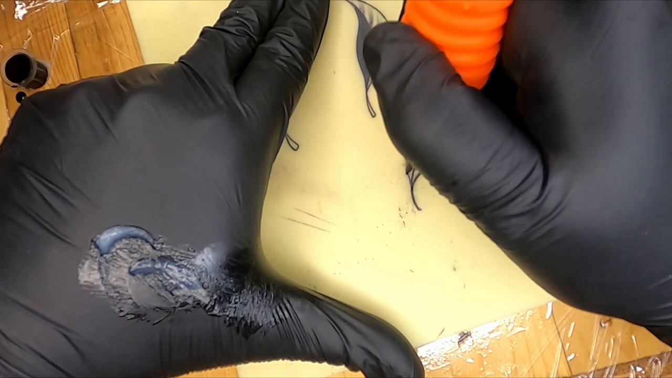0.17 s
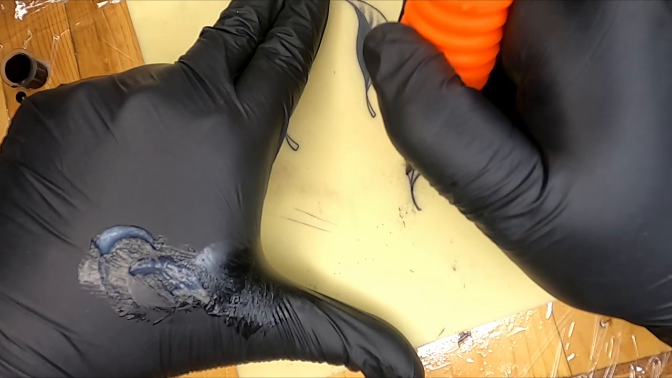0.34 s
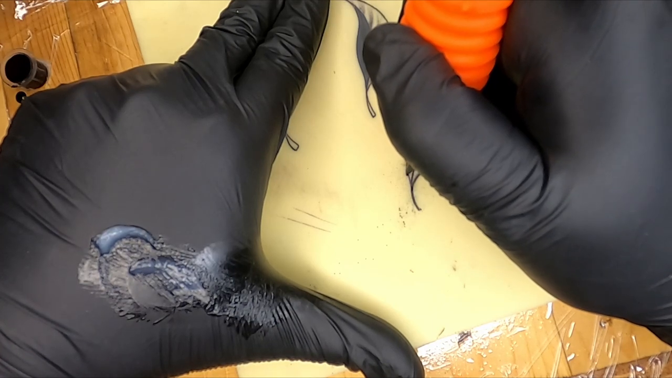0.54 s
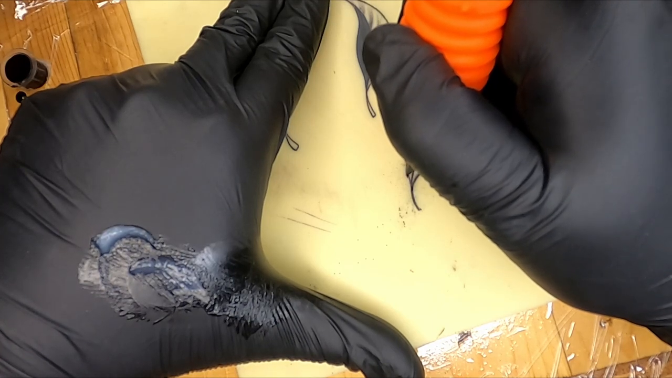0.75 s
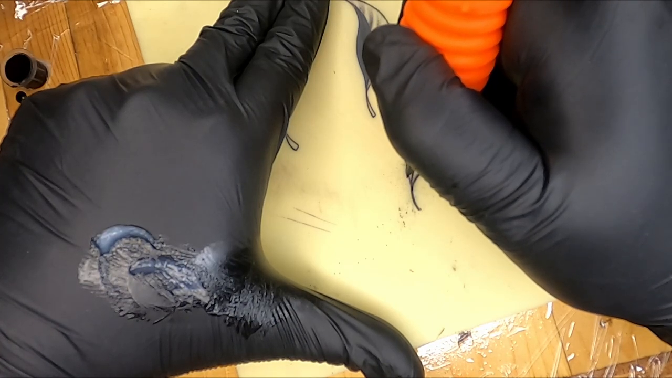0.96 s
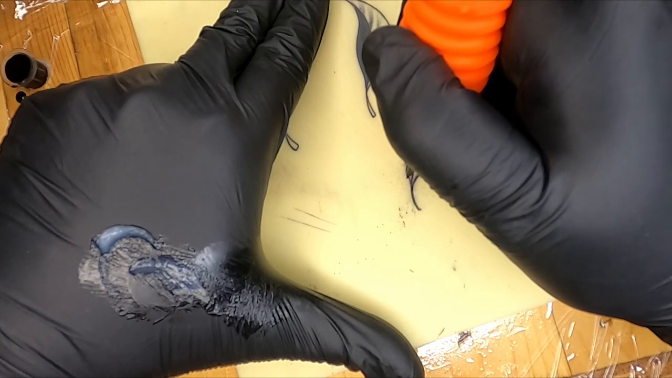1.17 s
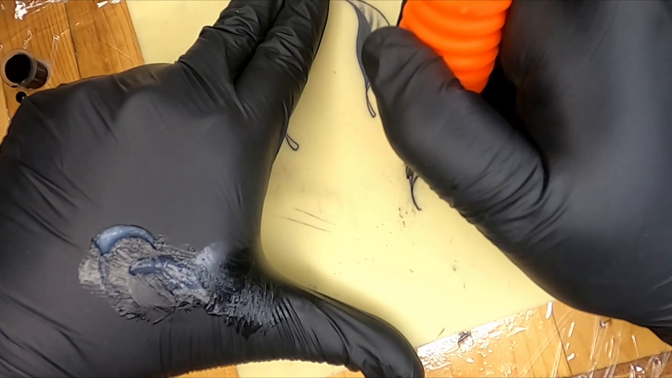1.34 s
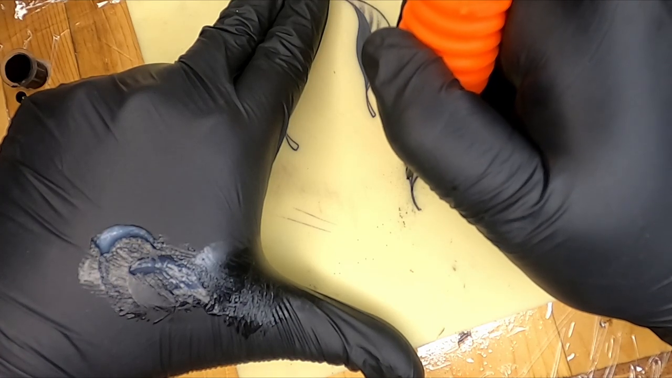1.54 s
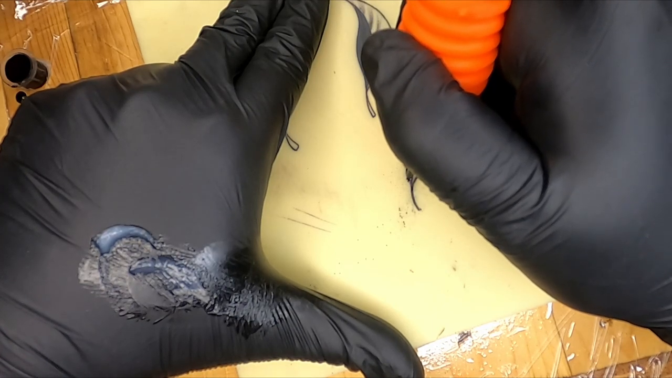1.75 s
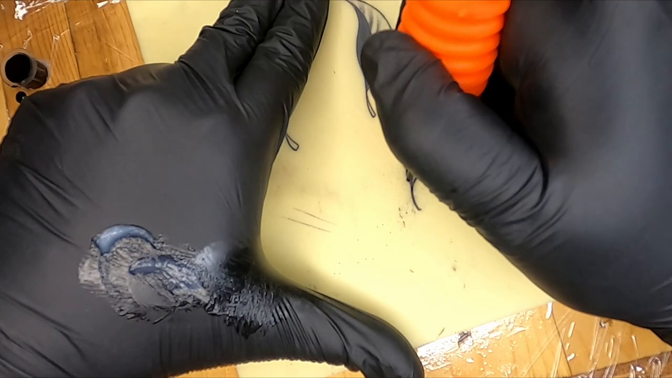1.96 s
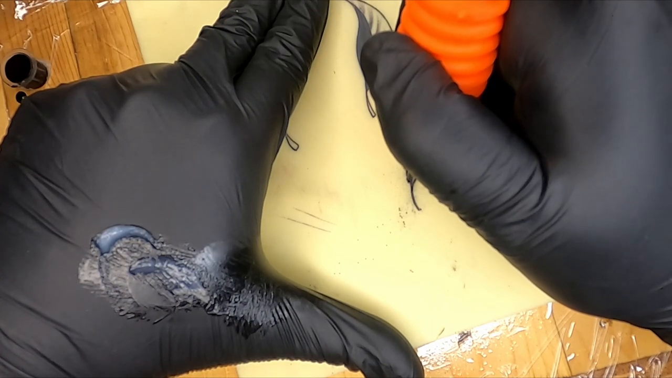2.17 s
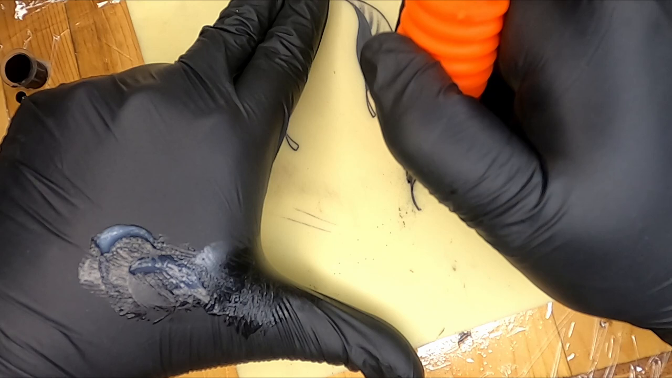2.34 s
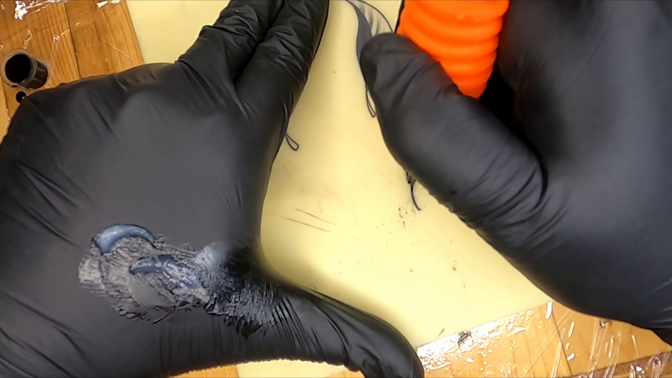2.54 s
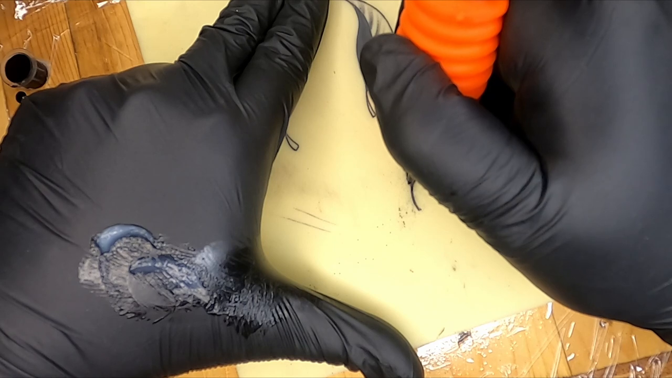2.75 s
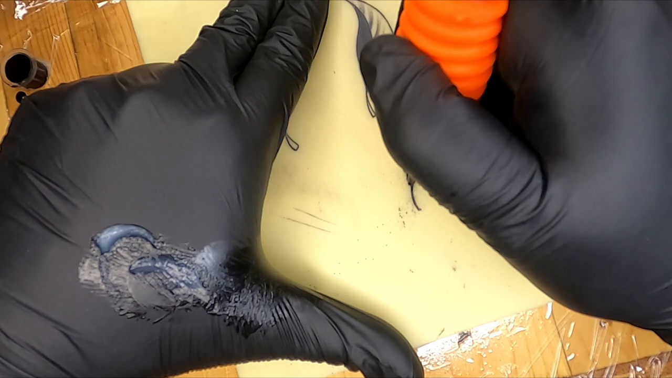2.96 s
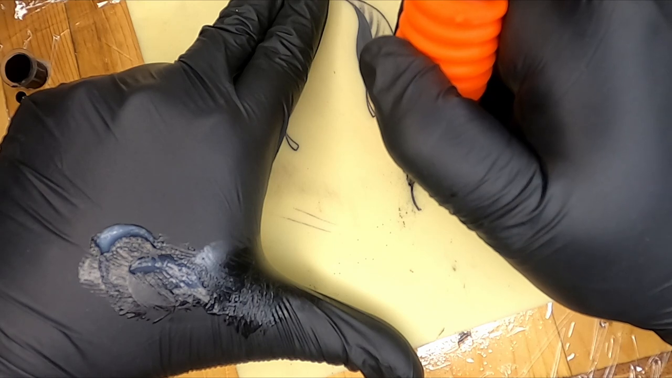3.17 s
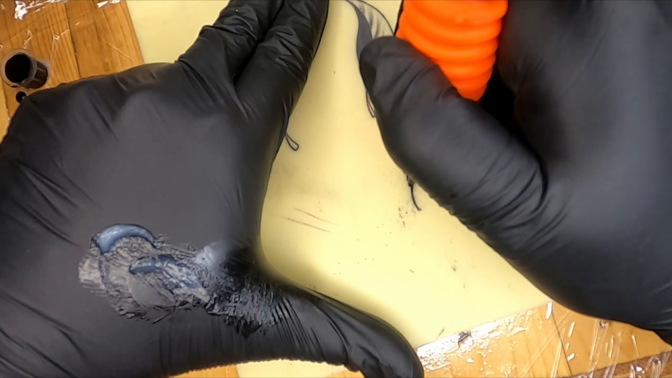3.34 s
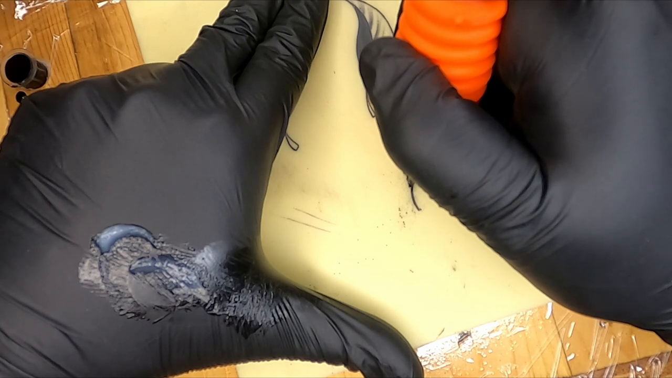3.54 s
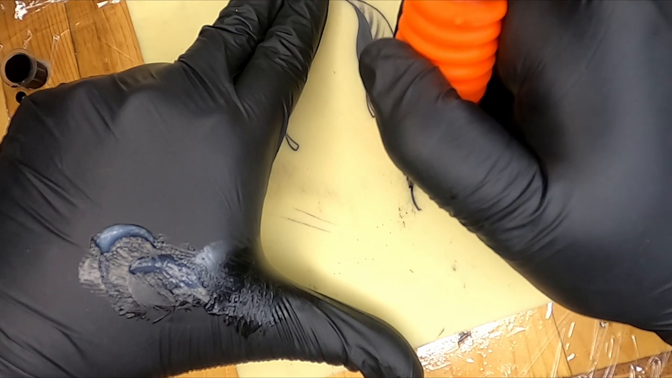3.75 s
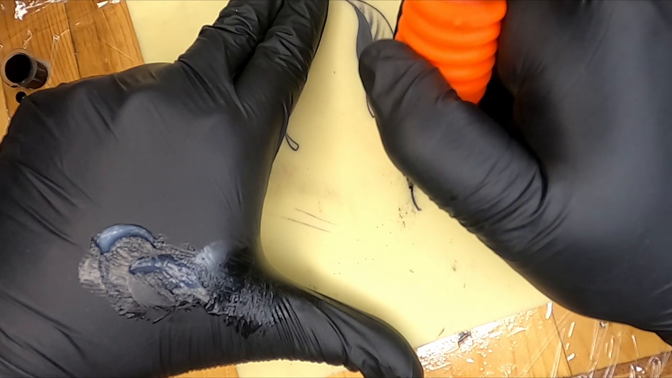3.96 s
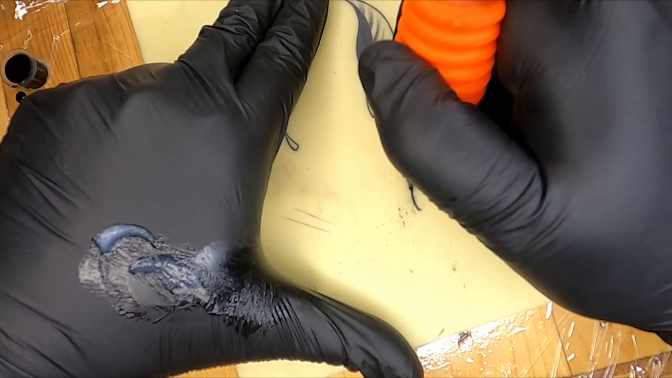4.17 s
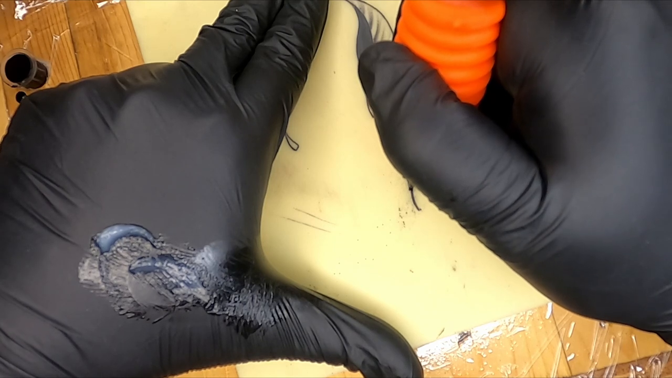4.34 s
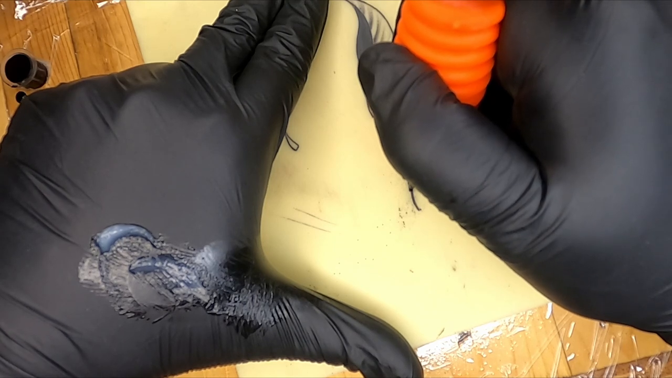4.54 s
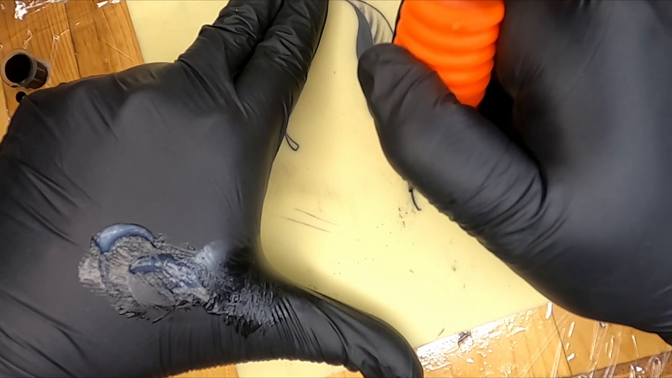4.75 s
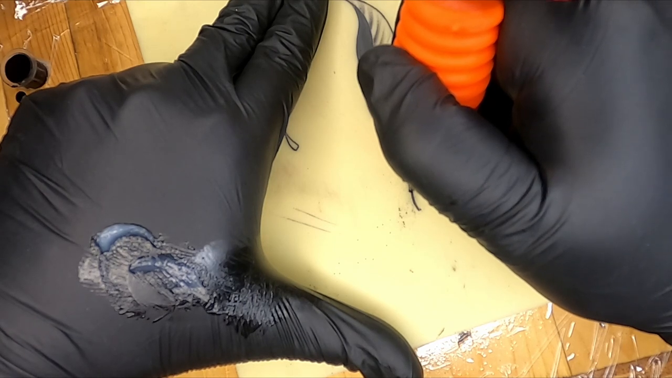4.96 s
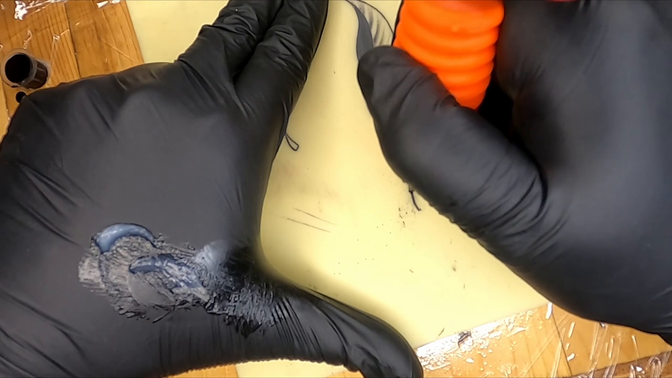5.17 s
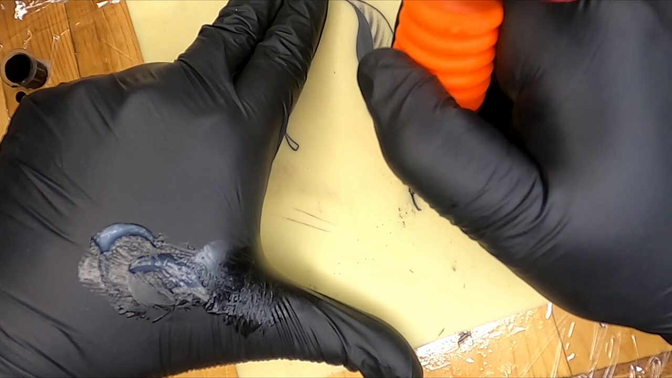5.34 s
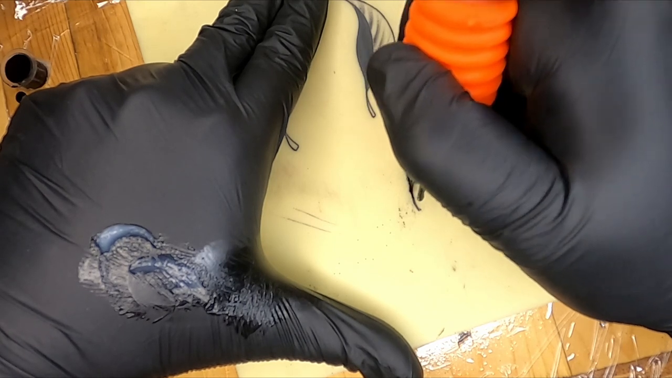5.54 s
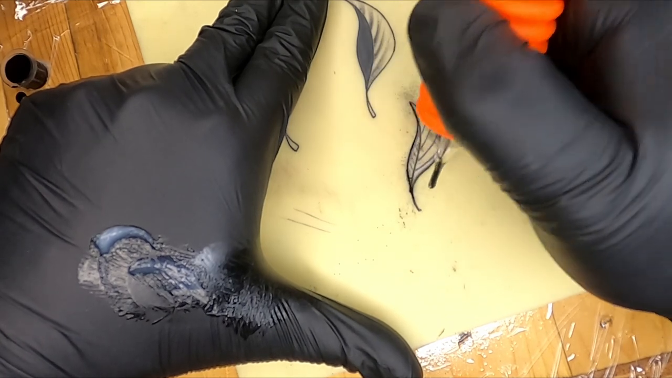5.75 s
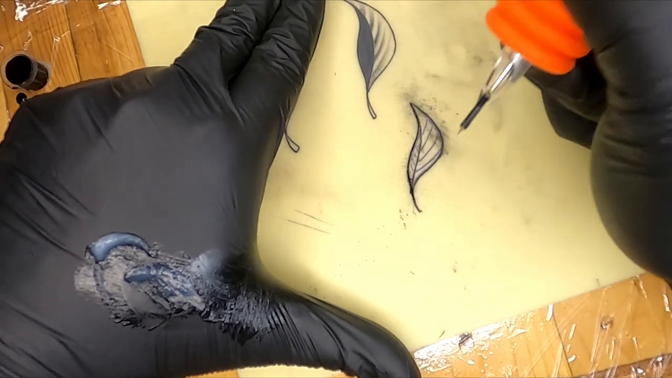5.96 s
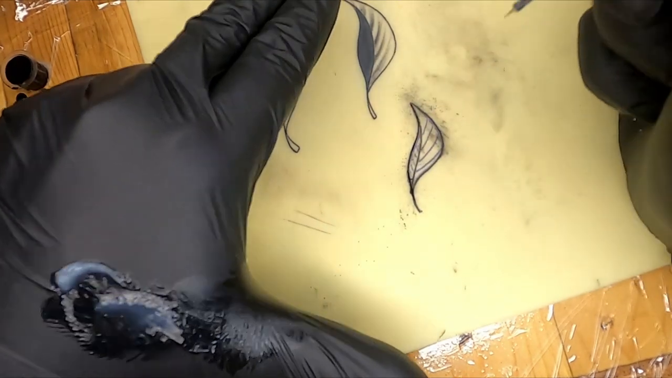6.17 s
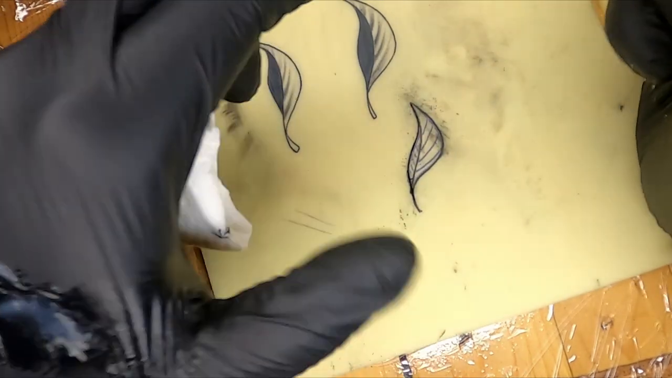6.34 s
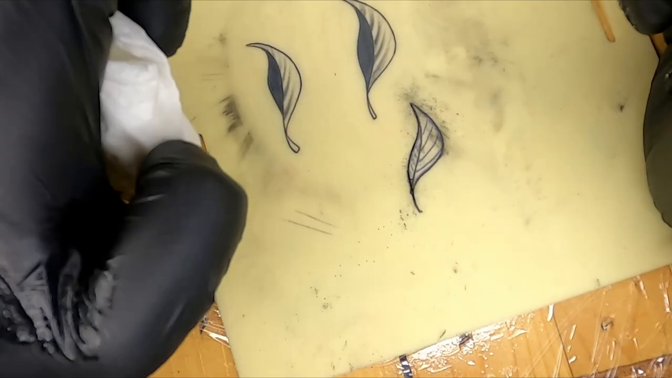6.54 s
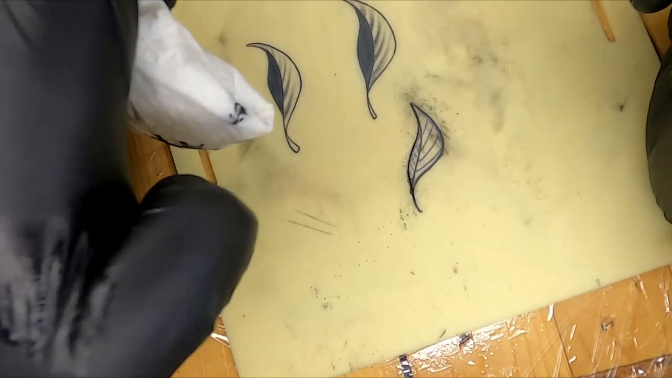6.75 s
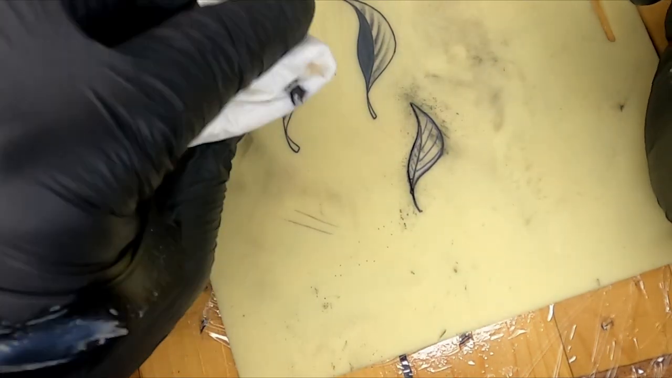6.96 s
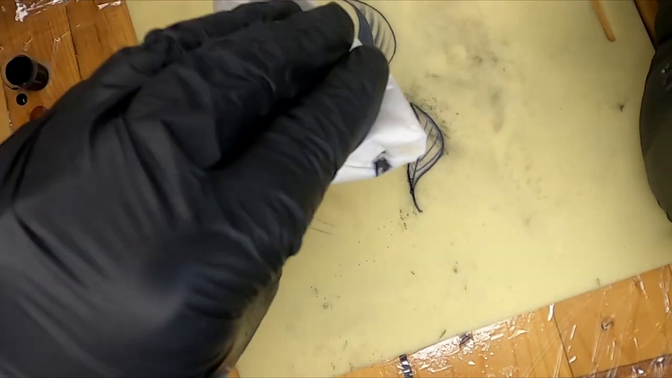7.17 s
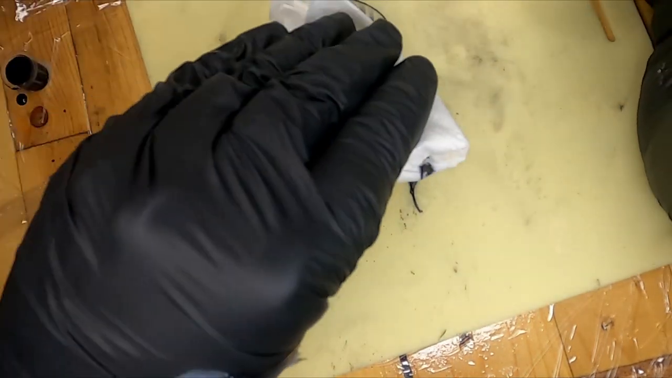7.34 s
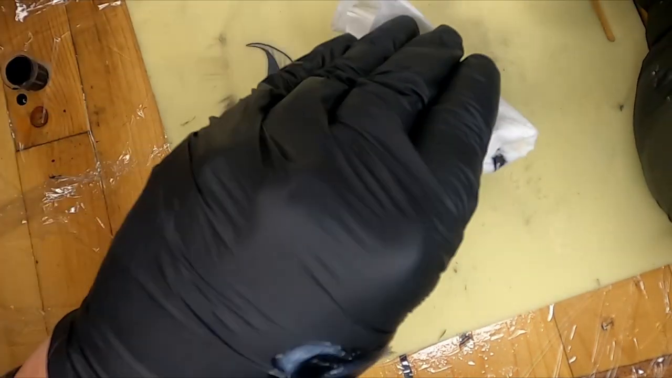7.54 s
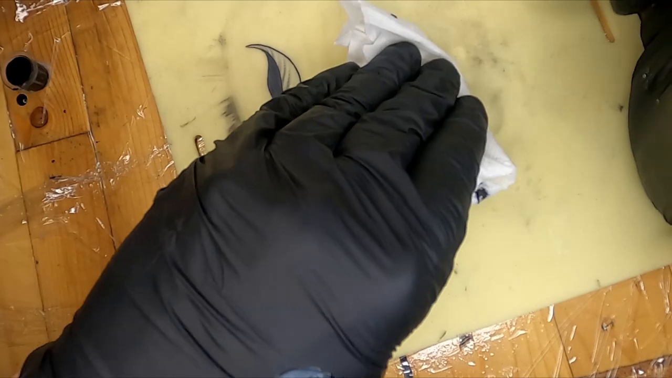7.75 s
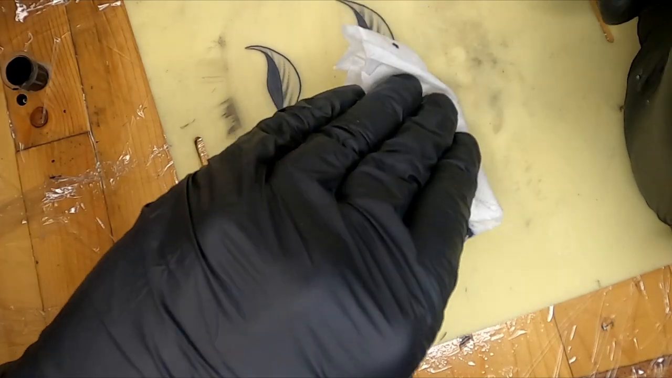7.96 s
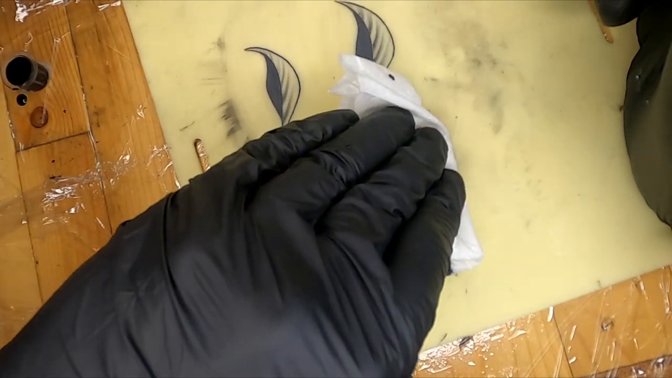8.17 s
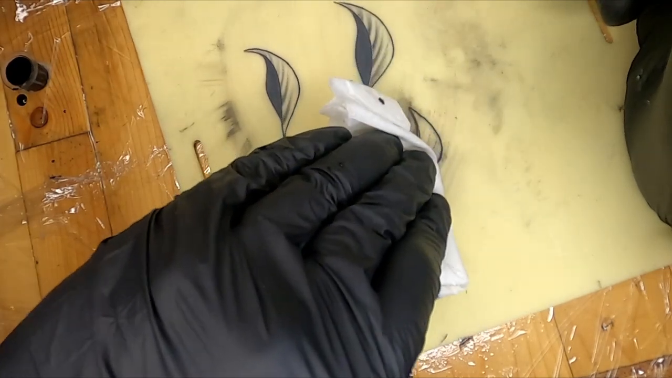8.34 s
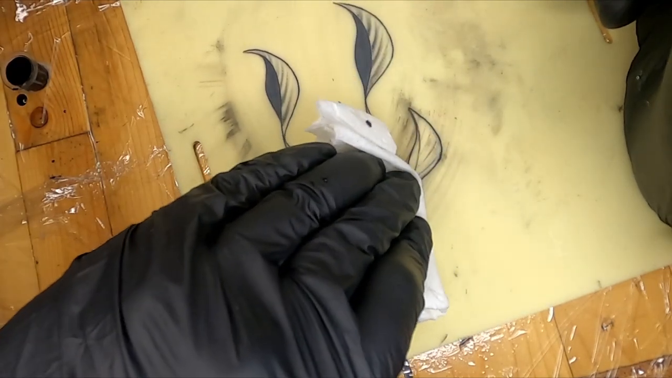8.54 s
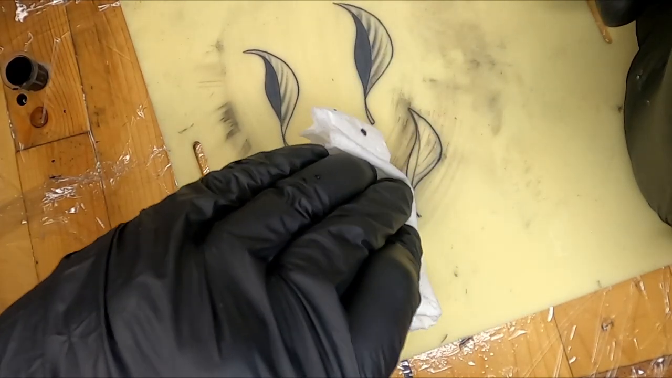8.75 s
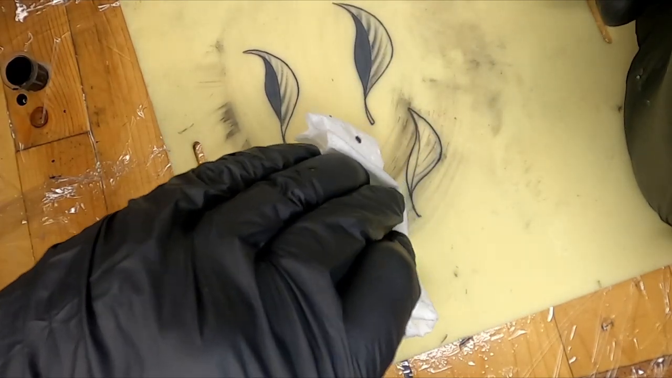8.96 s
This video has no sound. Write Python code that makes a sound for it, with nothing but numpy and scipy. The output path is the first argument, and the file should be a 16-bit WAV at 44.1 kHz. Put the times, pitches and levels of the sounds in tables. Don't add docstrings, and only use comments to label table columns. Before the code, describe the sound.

A rotary tattoo pen buzzes bright and steady up close, then is lifted away and runs on quieter while a towel softly wipes rubber.

```python
import sys
import numpy as np
from scipy import signal
from scipy.fft import rfft, irfft
from scipy.io import wavfile
from scipy.ndimage import uniform_filter1d, map_coordinates

SR = 44100
rng = np.random.default_rng(int(sys.argv[2]) if len(sys.argv) > 2 else 0)


def master(y):
    cut = np.clip(np.atleast_2d(y).T, -1, 1)
    pcm = np.round(cut * 32767)
    wavfile.write(sys.argv[1], SR, pcm.astype(np.int16))


def amplitude_ratio(level_db):
    exponent = np.asarray(level_db, float) / 20
    return 10 ** exponent


N = 396900

SHAFT_HZ = 105.4
NEEDLE_OUT_S = 5.47


def unit(x):
    return x / np.sqrt(np.mean(x ** 2))


def curve(table):
    seconds, values = np.array(table, float).T
    return np.interp(np.arange(N) / SR, seconds, values)


def by_place(place, db):
    return amplitude_ratio(np.interp(place, np.arange(3), db))


def walk(rate, size=N):
    hold = int(SR / rate * size / N)
    steps = np.repeat(rng.standard_normal(size // hold + 1), hold)
    return unit(uniform_filter1d(uniform_filter1d(steps, hold), hold)[:size])


def swells(rows):
    t = np.arange(N) / SR
    return sum(db * np.cos(np.pi * np.clip((t - middle) / length, -.5, .5)) ** 2 for middle, length, db in rows)


def band(x, hz, width_hz):
    g, k = np.tan(np.pi * min(hz, .45 * SR) / SR), width_hz / hz
    return signal.lfilter([k * g, 0, -k * g], [1 + k * g + g * g, 2 * (g * g - 1), 1 - k * g + g * g], x)


def steady(x, span_s=0.26):
    return x / np.sqrt(uniform_filter1d(x ** 2, int(span_s * SR)))


def clicks(at, size):
    out, near = np.zeros(N + 64), np.arange(-8, 9)
    keep = (at > 8) & (at < N - 9)
    whole = np.round(at[keep]).astype(int)[:, None] + near
    off = whole - at[keep][:, None]
    np.add.at(out, whole, size[keep][:, None] * np.sinc(off) * np.cos(np.pi * off / 18) ** 2)
    return out[:N]


def shaft():
    # time in seconds, turns ahead of a steady shaft.
    drift = [(0, -.08), (.43, -.117), (.7, -.092), (1.7, -.155), (1.85, -.18), (2.4, -.148), (2.95, -.085),
             (3.5, .03), (3.79, .13), (4.19, .173), (4.94, .5), (5.5, .66), (6.07, .454), (6.5, .466),
             (6.56, .517), (7.53, .562), (8.39, .45), (9, .43)]
    # start in seconds, length in seconds, turns lost.
    bites = [
        (1.19, .12, .025),
        (1.8, .18, .15),
        (2.32, .16, .08),
        (2.65, .11, .07),
        (3.3, .2, .05),
        (5.08, .11, .09),
    ]
    t = np.arange(N) / SR
    lost = sum(slip * np.clip((t - start) / length, 0, 1) for start, length, slip in bites)
    lost = uniform_filter1d(lost, 3000)
    brake_hz = np.gradient(lost) * SR
    lining = uniform_filter1d(1. * (t < NEEDLE_OUT_S), 4000)
    hunt = .002 * (1 + 2.2 * lining) * walk(12) + .007 * brake_hz * walk(28)
    return SHAFT_HZ * t + uniform_filter1d(curve(drift), 3000) - lost + hunt, brake_hz


def knocks(turns, place, cartridge_db):
    # moment in turns, colour in Hz, width in Hz, level in dB lining, lifted and resting.
    contacts = [
        (-.05, 7000, 30000, 0, 0, 0),
        (-.3, 7800, 1500, -8, -13, -10),
        (-.17, 5000, 8000, -22, -11, -10),
        (-.24, 9500, 5000, -20, -7, -8),
        (-.36, 3800, 3000, -22, -9, -12),
        (.55, 4000, 5000, -20, -12, -12),
    ]
    # resonance in Hz, width in Hz, usual level against the knock in dB lining, lifted, resting.
    cartridge = [(3650, 194, -17.5, -2.5, -36), (4010, 580, -17, -18.5, -14)]
    whole = np.arange(int(turns[-1]) + 2)
    drag = np.clip(SHAFT_HZ - np.gradient(turns) * SR, 0, 1)
    strikes = 0
    for k, (turn, hz, width_hz, *db) in enumerate(contacts):
        jitter_s, scatter_db = (12e-6, 2.5) if k else (3e-6, .5)
        chance = rng.standard_normal((len(whole), 2)).T
        at = np.interp(whole + turn, turns, np.arange(N))
        chance = chance * (1 + 0.63 * np.interp(at, np.arange(N), drag))
        chance = chance * np.interp(np.interp(at, np.arange(N), place), [0, 1], [1, .45])
        blows = clicks(at + chance[0] * jitter_s * SR, amplitude_ratio(scatter_db * chance[1]))
        strikes = strikes + by_place(place, db) * band(blows, hz, width_hz)
    fade = np.exp(-((turns - contacts[0][0]) % 1) / .07)
    rattle = amplitude_ratio(-8 + 4 * drag) * by_place(place, [0, -6, -6]) * fade
    grind = by_place(place, [-18, -19, -20])
    body = ring(unit(strikes) + (rattle + grind) * rng.standard_normal(N), place)
    for (hz, width_hz, *usual_db), db in zip(cartridge, cartridge_db):
        body = body + (amplitude_ratio(db) / by_place(place, usual_db) - 1) * band(body, hz, width_hz)
    return body + (amplitude_ratio(1.28 * drag * (1.5 + .5 * walk(25))) - 1) * band(body, 11900, 4500)


def ring(x, place):
    # resonance in Hz, width in Hz, level in dB lining, lifted and resting.
    shell = [(3610, 520, -4, -2.5, -3), (4325, 365, -2, -10.5, -15.5), (4886, 1100, -1.5, -7, -8.5),
             (5457, 680, -1, -12, -21), (6265, 500, -4, -5.5, -5.5), (6910, 830, 4, -4, -7.5),
             (7800, 950, 4, -1.5, -1.5), (8170, 840, 4, -3, -1.5), (9204, 610, -0.5, -1.5, -5.5),
             (9880, 550, 4, -3.5, 3), (11650, 1000, -14, -34, -12), (12350, 810, -3, -7, -13),
             (14200, 910, -23, -11.5, -13), (14700, 1500, -7, -15, -16)]
    # Hz, width in Hz, change in dB.
    notches = [
        (8606, 143, -13),
        (11360, 190, 3),
        (13340, 840, -1),
    ]
    shell_low_hz = [3850, 2700, 2700]
    f, out = np.fft.rfftfreq(1024, 1 / SR) + 1, 0
    late_s = .00045 * np.minimum(((f - 5800) / np.where(f > 5800, 4200, 2900)) ** 2, 1.1)
    spread = np.exp(-2j * np.pi * np.cumsum(late_s) * SR / 1024)
    for k in range(3):
        power = sum(amplitude_ratio(2 * row[2 + k]) / (1 + (2 * (f - row[0]) / row[1]) ** 2) ** 1.6 for row in shell)
        log_gain = np.log(power / (1 + (shell_low_hz[k] / f) ** 16)) / 2
        for hz, width_hz, db in notches if k == 0 else []:
            log_gain += np.log(amplitude_ratio(db)) * np.exp(-((f - hz) / width_hz) ** 2)
        fold = irfft(log_gain)[:513] * np.r_[1, np.full(511, 2), 1]
        response = irfft(np.exp(rfft(fold, 1024)) * spread)
        out = out + np.clip(1 - abs(place - k), 0, 1) * signal.fftconvolve(x, response)[:N]
    return out


def mirrored(x, place):
    # delay in ms lining, delay in ms away, level in dB lining, lifted, resting.
    mirrors = [(.2, .55, -12, -13, -13), (1.05, .8, -13, -12, -12), (1.75, 2.1, -17, -12, -14),
               (2.9, 2.5, -23, -13, -14)]
    moving = np.clip(uniform_filter1d(np.gradient(place) * SR, 8000), 0, 1)
    passing = amplitude_ratio(3 * moving)
    out = x
    for near_ms, away_ms, *db in mirrors:
        sway_ms = (.004 + .04 * np.minimum(place, 1)) * walk(2)
        lag = (np.interp(place, [0, 1], [near_ms, away_ms]) + sway_ms) * SR / 1000
        out = out + by_place(place, db) * passing * map_coordinates(x, [np.arange(N) - lag], order=3)
    return out


def echoes(x, place, t60_s=.12):
    t = np.arange(int(.15 * SR)) / SR
    tails = rng.standard_normal((3, len(t))) * np.exp(-np.log(1000) * t / t60_s) * (t > .002)
    return sum(np.sqrt(np.clip(1 - abs(place - k), 0, 1)) * signal.fftconvolve(x, tail / np.linalg.norm(tail))[:N]
               for k, tail in enumerate(tails))


def whirr(place):
    return by_place(place, [-22, -24, -24]) * unit(band(rng.standard_normal(N), 11300, 5500))


def hum(turns, place, wander_db=0.63, stray_db=-24):
    # multiple of the shaft rate, level in dB.
    hum_lining = [(1, -14), (2, -13), (3, -8), (4, -14.5), (5, -17), (6, -24.5), (7, -18), (8, -24.5),
                  (9, -4.5), (10, -15.5), (11, -13.5), (12, -5), (13, -2.5), (14, -10), (15, -8.5),
                  (16, -8), (17, -19.5), (18, -26.5), (19, -17.5), (20, -19), (21, -15.5), (22, -11.5),
                  (23, -13.5), (24, -19), (25, -19.5), (26, -17.5), (27, -14), (28, -15.5), (29, -15.5),
                  (30, -14)]
    hum_lifted = [(1, -7), (2, -19), (3, -38), (4, -20), (5, -36), (6, -21), (7, -23.5), (8, -19), (9, -11),
                  (10, -18.5), (11, -9.5), (12, -5), (13, -15), (14, -7), (15, -15), (16, -12.5), (17, -15),
                  (18, -24), (19, -18.5), (20, -9), (21, -15), (22, -13), (23, -13), (24, -7), (25, -14.5),
                  (26, -10.5), (27, -11.5), (28, -11), (29, -9.5), (30, -8)]
    hum_resting = [(1, -4), (2, -15.5), (3, -50), (4, -19), (5, -32), (6, -15), (7, -14.5), (8, -21),
                   (9, -2), (10, -4), (11, 1), (12, 1), (13, -9), (14, -4.5), (15, -14), (16, -6.5),
                   (17, -13), (18, -25), (19, -25), (20, -6), (21, -14), (22, -9), (23, -6), (24, -12),
                   (25, -2.5), (26, -4), (27, -13), (28, -2.5), (29, -7), (30, -45)]
    at = np.arange(0, N, 32)
    out, spot = 0, place[at]
    rough = by_place(spot, [-22, -27, -27])
    turn = np.exp(2j * np.pi * turns)
    spin = turn

    def flutter(rate):
        return walk(rate, size=len(at)) + 1j * walk(rate, size=len(at))

    for lining, lifted, resting in list(zip(hum_lining, hum_lifted, hum_resting))[1:]:
        multiple = round(lining[0])
        root, spin = multiple ** .5, spin * turn
        gain = by_place(spot, [lining[1], lifted[1], resting[1]])
        gain = gain * amplitude_ratio(wander_db * root * walk(2.96, size=len(at)))
        gain = gain * (1 + rough * root * flutter(90)) + amplitude_ratio(stray_db) * np.log10(multiple) * flutter(9)
        phase_turns = .35 * rng.random() - .12 * multiple
        gain = gain * np.exp(2j * np.pi * phase_turns)
        out = out + np.imag(spin * np.interp(np.arange(N), at, gain))
    return out


def chatter(turns, ring_db):
    at = np.interp(np.arange(int(turns[-1])) + .1, turns, np.arange(N))
    chance = rng.standard_normal((len(at), 2)).T
    struck = unit(clicks(at + 25e-6 * SR * chance[0], amplitude_ratio(0.83 * chance[1])))
    shaken = struck + 0.78 * rng.standard_normal(N)
    return amplitude_ratio(ring_db) * unit(band(band(shaken, 3586, 133), 3990, 360))


def table_shake(turns):
    # time in seconds, level in dB.
    shake = [(0, -60.5), (5.52, -61), (5.7, -67), (5.91, -52), (6.17, -48), (6.52, -61), (7, -59.5),
             (8.05, -54.5), (9, -51)]
    return np.sqrt(2) * amplitude_ratio(curve(shake)) * np.sin(2 * np.pi * turns) * (1 + 0.13 * walk(60))


def wiping():
    # start in seconds, length in seconds, level in dB.
    strokes = [
        (5.794, 0.48, -59),
        (6.373, 0.44, -61.5),
        (7.3, 0.44, -60.5),
        (8.45, 0.51, -67),
    ]
    t = np.arange(N) / SR
    edge_s, press = 0.17, 0
    for start, length, db in strokes:
        inside_s = np.minimum(t - start, start + length - t)
        press = press + amplitude_ratio(db) * np.clip(inside_s / edge_s + .5, 0, 1) ** 2
    grain = rng.standard_normal(N) * amplitude_ratio(3.2 * walk(25))
    return press * unit(band(band(grain, 410, 220), 420, 350) + 0.06 * band(grain, 900, 900))


def room(channels, air_db=-62):
    # pitch in Hz, level in dB.
    air_colour = [(20, -17), (50, -10), (80, 15), (150, 10.5), (300, 7), (600, 6), (1200, 4), (2500, 4.5),
                  (5000, -58), (15000, -46)]
    # time in seconds, level in dB.
    leans = [(.25, -53), (.87, -55), (1.53, -66), (1.88, -55), (2.43, -62), (2.61, -63), (3.5, -65),
             (5.74, -59), (6.07, -54), (6.57, -54), (6.93, -52), (7.18, -55), (7.56, -61), (7.71, -55),
             (7.77, -58), (8.25, -57)]
    hz, db = np.transpose(air_colour)
    f, t = np.fft.rfftfreq(N, 1 / SR) + 1, np.arange(N) / SR
    air = irfft(rfft(rng.standard_normal((channels, N))) * amplitude_ratio(np.interp(np.log(f), np.log(hz), db)), N)
    rumble = unit(band(band(band(rng.standard_normal((channels, N)), 18, 37), 16, 30), 15, 30))
    rise_s, fade_s = .03, .052
    weight = amplitude_ratio(-66 + 2.5 * walk(8))
    for s, lean_db in leans:
        weight = weight + amplitude_ratio(lean_db) * np.exp(-abs(t - s) / np.where(t < s, rise_s, fade_s))
    return amplitude_ratio(air_db) * unit(air) + weight * rumble


def parting(mid):
    # start in seconds, end in seconds, side against middle in dB.
    spells = [(0.0, 0.168, -20.5), (0.436, 0.55, -18), (0.854, 0.98, -20), (1.416, 1.491, -19.5),
              (1.672, 1.85, -19), (2.317, 2.473, -19.5), (2.711, 2.852, -18.5), (3.17, 3.197, -26),
              (3.98, 4.01, -30), (4.222, 4.301, -19), (4.777, 4.91, -20), (4.964, 5.197, -19),
              (5.66, 5.802, -19.5), (6.024, 6.054, -22), (6.222, 6.251, -25), (6.35, 6.37, -26),
              (6.54, 6.56, -27), (7.168, 7.19, -30)]
    hz, s, frames = signal.stft(mid, SR, nperseg=512)
    smooth = uniform_filter1d(abs(frames), size=130, axis=0)
    size = np.where(hz[:, None] > 4000, smooth, abs(frames))
    gate = np.zeros(frames.shape)
    for start, low, wide in rng.random((90, 3)):
        low_hz, at_s = 4000 + 10000 * low, 9 * start ** 1.3
        inside = (hz > low_hz) & (hz < low_hz + 500 + 3500 * wide)
        gate[np.ix_(inside, abs(s - at_s) < .012)] = amplitude_ratio(-24)
    for start, end, db in spells:
        gate[:, (s > start) & (s < end)] = amplitude_ratio(db + 3.5)
    blur = size * gate * np.exp(2j * np.pi * rng.random(frames.shape))
    return signal.istft(blur, nperseg=512)[1][:N]


def scene():
    # time in seconds, the pen's place (0 lining, 1 lifted, 2 resting).
    path = [
        (0, 0),
        (5.45, 0),
        (5.5, .05),
        (5.78, .1),
        (6.25, .9),
        (6.7, 1),
        (7.7, 1.1),
        (8.15, 1.9),
        (9, 2),
    ]
    # time in seconds, knock level in dB.
    knock_level = [
        (0, -22),
        (1, -21.5),
        (5.94, -21.5),
        (6.22, -27),
        (6.47, -30),
        (6.56, -29),
        (7.84, -29),
        (8.12, -26.5),
        (9, -27),
    ]
    hum_db = [-18, -11.5, -13.5]
    # middle in seconds, length in seconds, rise in dB.
    loose = [(1.0, 0.16, 6), (1.45, 0.78, 2), (1.904, 0.62, 5.5), (2.35, 0.91, 2), (3.67, 0.7, 4),
             (4.3, 1.1, 3.5), (4.925, 0.51, 4.5), (5.28, 0.37, 6), (6.05, 0.88, 7.5), (6.8, 0.91, 6),
             (7.3, 0.55, 10), (8.652, 1, 3)]
    # middle in seconds, length in seconds, rise in dB.
    cupped = [
        (6.002, 0.35, 10.5),
        (6.384, 0.42, 6.5),
        (7.07, 0.22, 2),
    ]
    turns, brake_hz = shaft()
    place = np.clip(curve(path), 0, 2)
    level_db = curve(knock_level) + 0.36 * brake_hz + 0.35 * walk(6)
    calm_db = [[-18.5, -18.5, -36.5], [-14.5, -11.5, -10.5]]
    rings_db = [np.interp(place, np.arange(3), calm) + swells(rows) + 0.75 * walk(7)
                for calm, rows in zip(calm_db, [loose, cupped])]
    direct = -knocks(turns, place, rings_db)
    scattered = by_place(place, [-15, -7, -7]) * echoes(direct, place)
    pen = amplitude_ratio(level_db) * steady(mirrored(direct, place) + scattered)
    needle_out = np.clip((np.arange(N) / SR - NEEDLE_OUT_S) / 0.11, 0, 1)
    hum_gain = amplitude_ratio(level_db - 2 * needle_out) * by_place(place, hum_db)
    low = hum_gain * steady(hum(turns, np.maximum(place, 0.36 * needle_out)))
    low = low + chatter(turns, level_db + rings_db[0]) * by_place(place, [-3, -8, -10])
    air_mid, air_side = room(channels=2)
    mid = amplitude_ratio(level_db) * whirr(place) + pen + low + table_shake(turns) + wiping() + air_mid
    side = parting(mid) + amplitude_ratio(-16 + 5.1 * walk(30)) * air_side
    return np.array([mid + side, mid - side])


def band_limit(x):
    return signal.sosfilt(signal.butter(12, 16230, fs=SR, output="sos"), x)


def record(dry):
    top_cut = signal.ellip(10, .1, 45, 15800, fs=SR, output="sos")
    return band_limit(signal.sosfiltfilt(top_cut, dry))


dry = scene()
out = record(dry)
master(out)
```